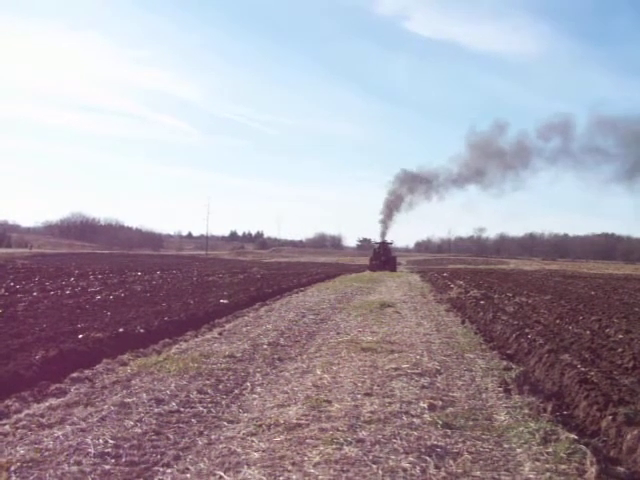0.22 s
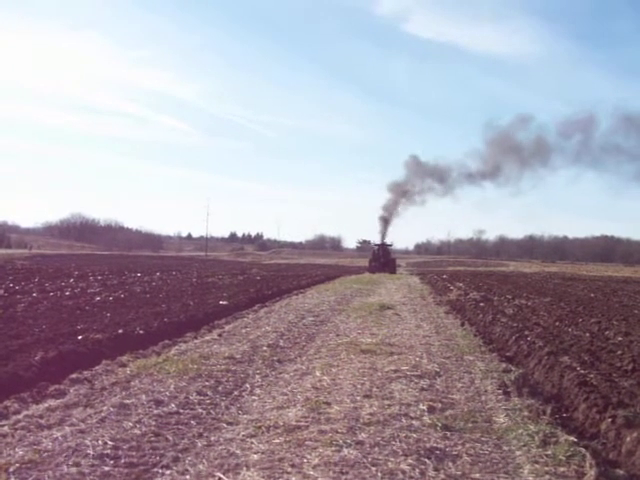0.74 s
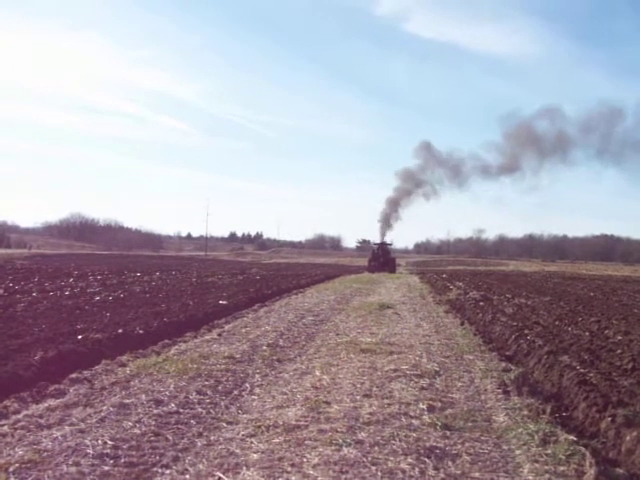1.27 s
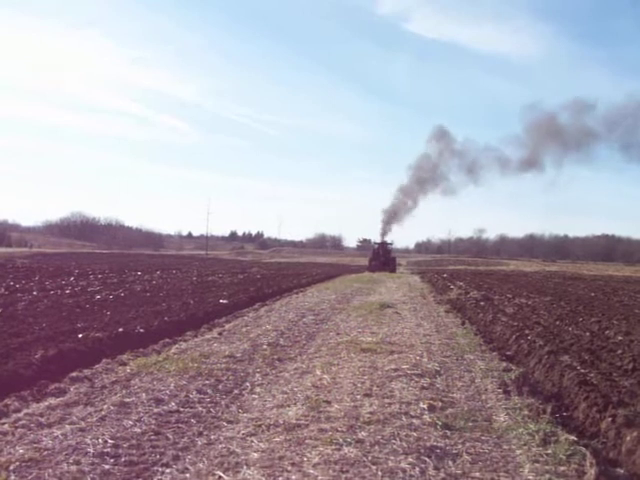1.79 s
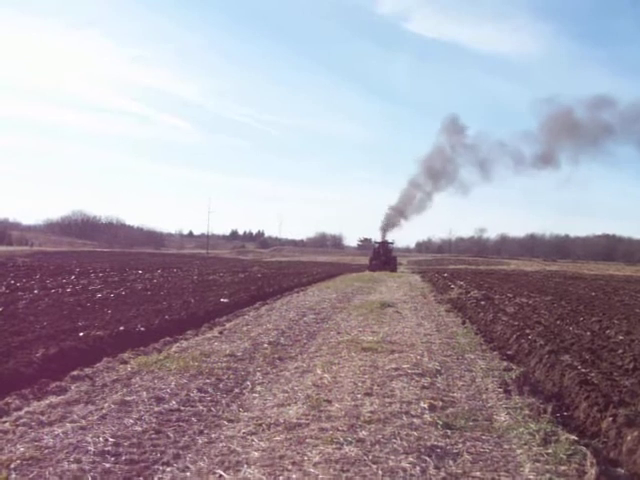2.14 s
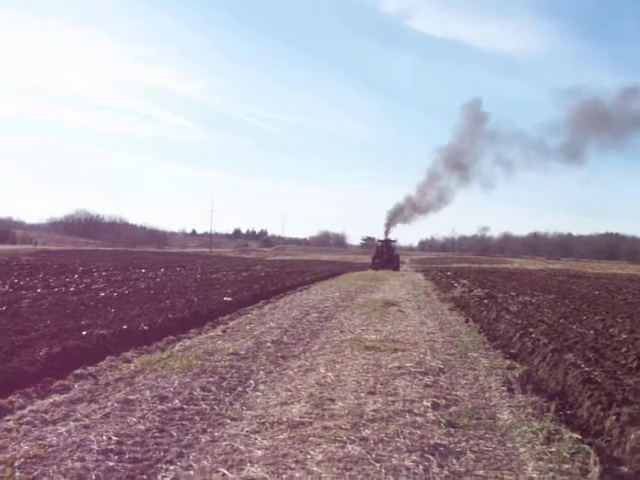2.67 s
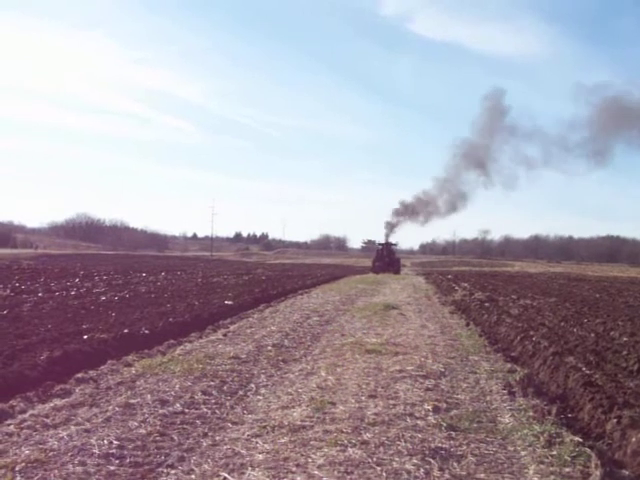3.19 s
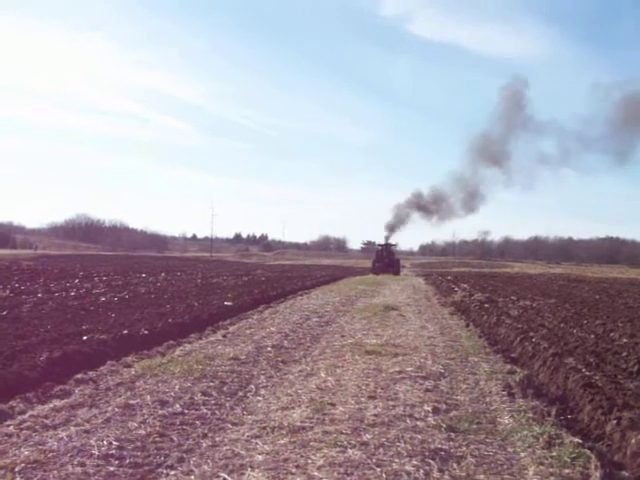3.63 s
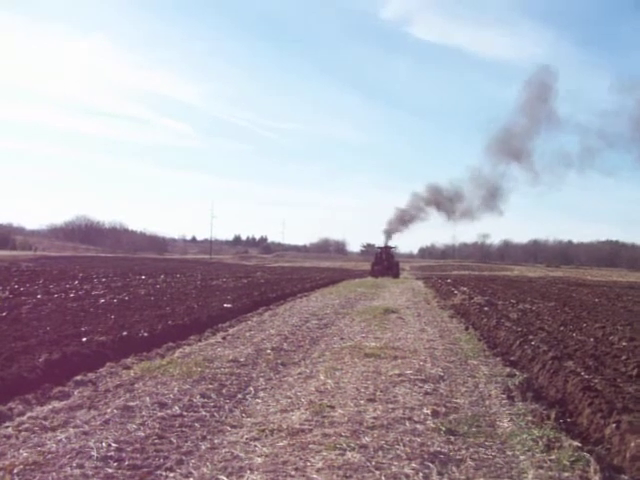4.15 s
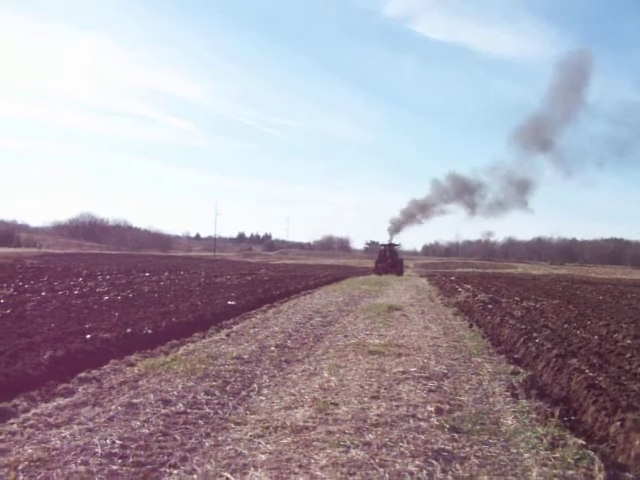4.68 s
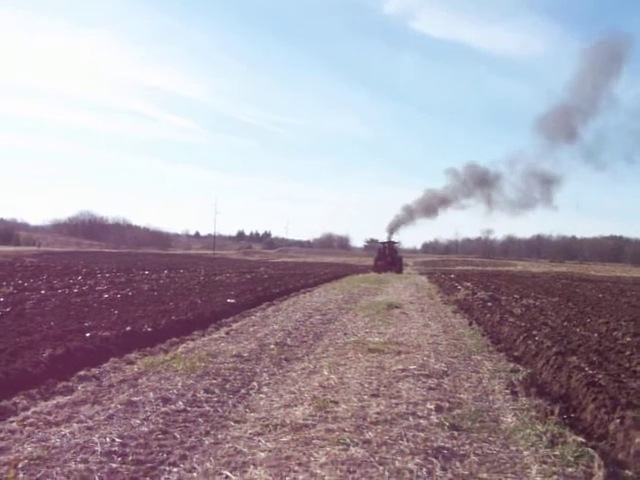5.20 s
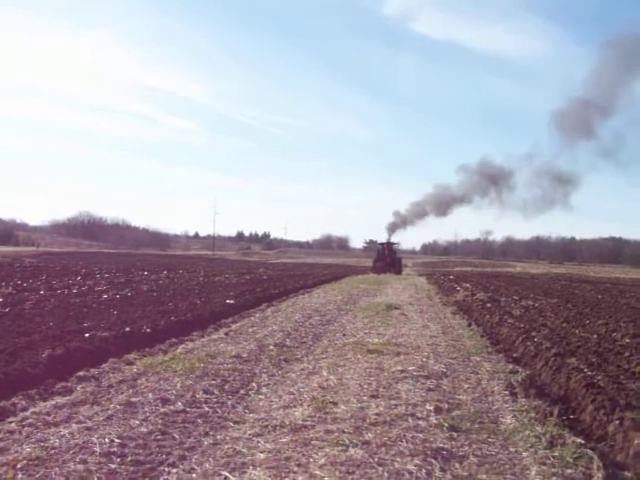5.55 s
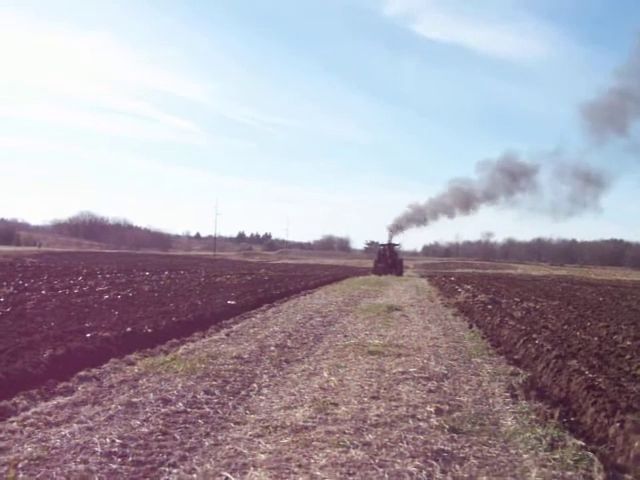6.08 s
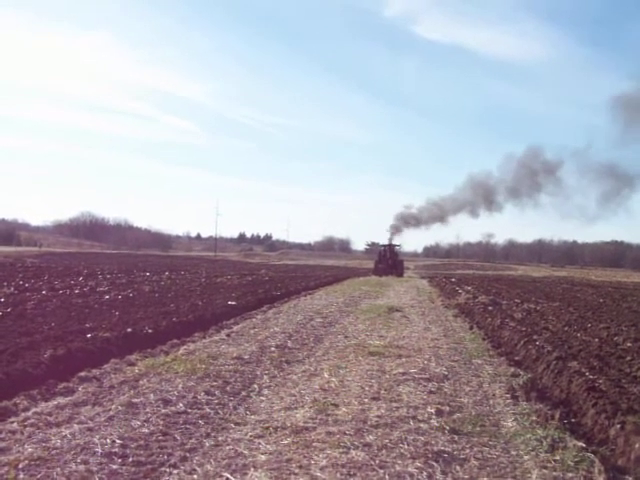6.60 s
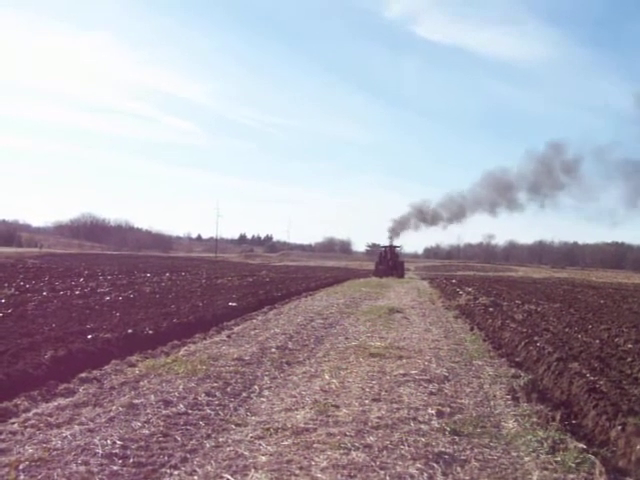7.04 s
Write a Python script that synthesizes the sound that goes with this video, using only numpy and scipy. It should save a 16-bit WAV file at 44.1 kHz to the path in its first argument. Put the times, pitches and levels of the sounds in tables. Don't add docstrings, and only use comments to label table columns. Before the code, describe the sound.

The sound begins with the engine already working: a distant steam traction engine chuffing evenly at just over seven beats a second throughout. Each chuff is a short, raspy burst of steam, mostly midrange and hiss, followed by a thinner after-hiss that cuts off before the next. Strength and brightness vary from beat to beat, with a slightly hollow, drifting colour from the ground reflection. A low rough hum, faint gear tones and a soft field wash continue underneath. Light wind puffs touch the microphone from 0 to 2.5 seconds, with a faint squeak near 1.4. Around 2.6 hard low thumps hit, and fluttering buffets crowd 3.1 to 4.7 seconds, partly covering the engine. From 5 to 6 it is calmer, then gusts return near 6.4 and 6.9. Tiny camera ticks are scattered, several near 2.5 to 3.9. The chuffing continues to the end, around 7.3 seconds, with dull treble.

```python
import sys
import numpy as np
from scipy import signal
from scipy.fft import rfft, irfft, next_fast_len
from scipy.io import wavfile
from scipy.ndimage import uniform_filter1d, map_coordinates

SR = 44100
rng = np.random.default_rng(int(sys.argv[2]) if len(sys.argv) > 2 else 0)


def elevation(decibels):
    levels = np.asarray(decibels, float)
    return 10 ** (levels / 20)


def generate_wav(sig):
    pcm = np.round(np.clip(np.atleast_2d(sig).T, -1, 1) * 32767).astype(np.int16)
    wavfile.write(sys.argv[1], SR, pcm)


N = 322812
T = np.arange(N) / SR

RISE_S, FALL_S = 0.018, 0.016
RAGGED_S, TOP_LATE_S = 0.0028, 0.0023

# start in seconds, blast level in dB, throat band
# against the blast in dB, lower hiss against the blast in dB.
EXHAUST_BEATS = [(-0.032, -23, -16, -23.5), (0.237, -32.5, -1, -3.5), (0.513, -31, -1, -8),
                 (0.784, -34.5, 3, -2), (1.06, -33, 0.5, -0.5), (1.331, -34, 3, -1), (1.604, -31, 0, -6),
                 (1.886, -28, -3, 1), (2.152, -29, 4.5, 1), (2.422, -30.5, 1, 0.5),
                 (2.694, -32.5, 2.5, 2.5), (2.966, -33, -0.5, 0.5), (3.244, -30, -1.5, 2),
                 (3.517, -33.5, 2.5, 0), (3.794, -31, -1.5, -4), (4.076, -37, 5.5, 4),
                 (4.357, -30.5, -1.5, -3), (4.629, -28.5, -4, -1.5), (4.9, -31.5, -2, -2.5),
                 (5.158, -37.5, 4, 1), (5.445, -36.5, 4.5, -1.5), (5.719, -30, 1, -2), (5.99, -30, -3, -1),
                 (6.262, -32.5, 0.5, 3), (6.544, -29, -3, -1), (6.815, -33.5, 1, -3.5),
                 (7.089, -33.5, 4.5, -4.5),
                 (0.105, -29, -3.5, -1.5), (0.381, -30, -0.5, 0.5), (0.651, -31.5, 2.5, -7.5),
                (0.926, -32.5, -2, 1.5), (1.204, -32.5, -1.5, 2.5), (1.475, -30.5, -2, 0),
                (1.75, -27.5, -3, -2), (2.024, -27, -0.5, 0), (2.293, -27, -3.5, -0.5),
                (2.562, -28.5, -0.5, -0.5), (2.833, -30.5, -2, -1.5), (3.108, -30, 0, 0),
                (3.387, -32, -2.5, 4.5), (3.66, -34.5, 5.5, 3.5), (3.943, -34.5, 3.5, 1),
                (4.225, -33, 3, 3.5), (4.495, -30, -0.5, -1.5), (4.77, -27, -4.5, -5.5),
                (5.045, -28.5, -4, -0.5), (5.314, -31, 1.5, -4), (5.588, -32, 1, -1), (5.864, -28.5, -3, 2),
                (6.133, -31, 3, 4), (6.408, -34, 6, 4), (6.687, -33, 4.8, 0), (6.959, -30, 3, -2),
                (7.237, -29.5, 0, -2)]
BEATS = np.array(sorted(EXHAUST_BEATS))


def beat():
    start = BEATS[:, 0] - RISE_S / 2 - RAGGED_S
    k = np.maximum(np.searchsorted(start, T) - 1, 0)
    return k, T - start[k]


def puff(age, hold_s, fall_s):
    rise = np.sin(np.pi / 2 * np.clip(age / RISE_S, 0, 1)) ** 2
    return rise * np.exp(-np.maximum(age - RISE_S - hold_s, 0) / fall_s)


ZONES_HZ = [300, 950, 2100, 3150, 4600, 9500]
# frequency in Hz, density in dB per Hz.
JET_SPECTRUM = [(180, -39), (300, -7), (432, -24), (707, -2.5), (1030, -6), (1410, -4), (1550, -8.5),
                (1950, -8), (2880, -3), (3410, -2), (4210, -5), (4720, -11), (5990, -14.5), (7500, -27.5),
                (8630, -29.5), (11200, -77.5), (19000, -120)]
# time in seconds, clearness in dB.
AIR = [(0, -0.5), (0.3, -3), (0.6, 2), (1.15, -6), (1.55, 0), (1.8, -6.5), (2.15, -1), (2.35, 2),
       (2.6, -4.5), (3.3, -3), (3.6, 5), (4.0, 1.5), (4.75, 1.5), (5.1, -1), (5.85, -2.5), (6.13, 5),
       (6.3, -1.5), (6.8, 1.5)]


def chuffs(k, age):
    s, db, throat, lower = BEATS[k].T
    middle = -7 + 0.51 * throat - 18.5 * (along(ECHO, s)[0] - 0.66)
    top = -9.5 + lower + along(AIR, s)[0]
    hold_s = 0.012 * elevation(0.86 * (-32 - db))
    crackle = walk(260)
    crackle = crackle - uniform_filter1d(crackle, size=900)
    beat_start = np.clip((T - age) * SR, 0, N - 1).astype(int)
    out = 0
    for lo, hi, rel in zip(ZONES_HZ, ZONES_HZ[1:], (throat, middle, lower, 0, top)):
        jet = shaped(lambda hz: colour(JET_SPECTRUM, hz) * zone(hz, lo, hi))
        eddy = walk(110)
        late = RAGGED_S * (1 + np.tanh(eddy[beat_start])) + TOP_LATE_S * (lo / 4600) ** 2
        jet = jet * puff(age - late, hold_s, FALL_S)
        crackle_db = 2.5 * (hi / 4600) ** 0.52 * crackle
        out = out + jet * elevation(db + rel + crackle_db + 1.33 * eddy)
    return out


# frequency in Hz, density in dB per Hz.
HISS_SPECTRUM = [(880, -48), (1500, -13.5), (1720, -7), (2430, -11), (2730, -3.5), (3480, -2.5),
                 (3830, -7.5), (4800, -15.5), (5250, -12), (7290, -45.5), (8630, -27.5), (11200, -75.5),
                 (19000, -120)]
# time in seconds, steam left for the after-blow in dB,
# ring of the loaded gears in dB, high singing of the nozzle in dB.
LOAD = [(0, -37, -40, -0.5), (0.5, -43, -50.5, -7), (0.75, -36.5, -40.5, -3), (1.0, -40.5, -40.5, 0),
        (1.35, -39.5, -40, -4), (1.7, -39.5, -41.5, -4.5), (2.1, -36.5, -37, -6.5),
        (2.65, -36, -40.5, -0.5), (2.98, -37.5, -42.5, 2.5), (3.5, -40.5, -39.5, -8), (3.8, -41, -45, -6),
        (4.15, -40.5, -37.5, -5), (4.75, -41.5, -43.5, 3.5), (5.1, -39, -39, -5), (5.5, -41, -42.5, -2),
        (6.05, -33, -35.5, -5.5), (6.55, -41.5, -44.5, -3.5), (7.2, -39, -38.5, -5)]


def afterblow(k, age):
    sag_db_per_s, shut_s, shut_db = -26.5, 0.1176, -10
    flow = along(LOAD, BEATS[k, 0])[0]
    top = -12.5 + along(AIR, BEATS[k, 0])[0]
    shut = shut_db * np.clip((age - shut_s) / 0.0045, 0, 1)
    db = uniform_filter1d(flow + sag_db_per_s * age + shut, size=800) + 0.43 * walk(200)
    body = shaped(lambda hz: colour(HISS_SPECTRUM, hz) * zone(hz, 1000, 4600))
    body = body * elevation(2.0 + 1.3 * walk(40))
    edge = shaped(lambda hz: colour(HISS_SPECTRUM, hz) * zone(hz, 4600, 8000))
    edge = edge * elevation(1.0 + top + 0.83 * walk(30))
    sing = wavering(3500, 130, 0.03 * walk(12), 0.2) * elevation(-2.5 + 3.0 * walk(25))
    patch = wavering(5600, 340, 0.033 * walk(8.9), 0.1)
    patch = patch * elevation(top + along(LOAD, T)[2] + 4.9 * walk(12))
    return (body + edge + sing + patch) * elevation(db)


# frequency
# in Hz, width in Hz, rms level in dB, swell with each beat in dB.
HUM = [
    (188, 27.7, -38, 4.5),
    (542, 10, -55.5, 7),
    (686.5, 33, -52.5, 8.5),
    (1378, 39, -52, 8),
    (2150, 260, -55, 12.5),
]


def hum(k, age):
    swell = uniform_filter1d(puff(age, 0.02, 0.069), size=600)
    tones = 0
    for hz, width_hz, db, lift in HUM:
        tone = wavering(hz, width_hz, 0.015 * walk(6), 0.43)
        tones = tones + tone * elevation(db + lift * (2 * swell - 1) + 1.1 * walk(4.11))
    gear_ring = wavering(1160, 59, 0.035 * walk(12), 0)
    return tones + gear_ring * elevation(2.5 * walk(20) + along(LOAD, T)[1] - 6.5)


# time in seconds, echo lag in ms.
ECHO = [(0.12, 0.585), (0.95, 0.59), (1.55, 0.655), (2.58, 0.61), (3.41, 0.66), (4.24, 0.75), (5.25, 0.75),
        (6.15, 0.67), (6.6, 0.66), (7.25, 0.665)]


def ground(x):
    lag = (along(ECHO, T)[0] + 0.017 * walk(13)) * SR / 1000
    echo = map_coordinates(x, [np.arange(N) - lag], order=1)
    return level(x + elevation(-8) * echo) * np.std(x)


# start in seconds, length in seconds, pitch in Hz, level in dB.
SQUEAKS = [
    (1.44, 0.033, 7100, -52),
    (2.925, 0.036, 7050, -59),
]


def squeaks():
    out = 0
    for s, length, hz, db in SQUEAKS:
        swell = np.sin(np.pi * np.clip((T - s) / length, 0, 1))
        out = out + elevation(db - 7) * swell * np.sin(2 * np.pi * hz * T)
    return out


# time in seconds, peak level in dB.
TICKS = [(0.0736, -40.5), (1.577, -39), (2.5286, -41.5), (2.712, -37), (3.262, -39), (3.272, -39.5),
         (3.351, -45.5), (3.8713, -36.5), (5.499, -41.5)]


def ticks():
    burst = sum(elevation(db + 1.0) * np.exp(-np.abs(T - s - 0.001) / 0.00072) for s, db in TICKS)
    return burst * shaped(lambda hz: bell(hz, 6000, 4500))


# time in seconds, peak level in dB, pitch in Hz.
SLAPS = [(0.052, -20, 91.5), (1.518, -16.5, 78.1), (2.584, -15, 202), (2.612, -7.5, 183), (2.691, -7, 196),
         (2.702, -7.5, 130), (3.107, -14.5, 184), (3.249, -13.5, 164), (3.613, -9.5, 170),
         (3.668, -10.5, 145), (3.784, -8, 160), (3.856, -10.5, 170), (3.976, -9, 188), (4.074, -10, 119),
         (4.149, -9, 223), (4.21, -6, 160), (4.265, -20.5, 96.9), (4.339, -10, 144), (4.424, -14.5, 97),
         (4.498, -11.5, 132), (4.558, -17, 113), (4.599, -21, 178), (4.7, -14, 146), (6.333, -16, 72.7),
         (6.405, -11, 85)]


def slaps():
    cycles, glide = 1.15, -0.092
    out = np.zeros(N)
    for (s, db, hz), turn in zip(SLAPS, rng.random(len(SLAPS))):
        near = slice(max(int(s * SR) - 2000, 0), int(s * SR) + 4000)
        cycle = (T[near] - s) * hz - cycles / 2
        swing = cycle * (1 + glide * np.tanh(cycle / cycles))
        envelope = np.exp(-(cycle / cycles) ** 2 * 2)
        out[near] += elevation(db - 4.0) * envelope * np.sin(2 * np.pi * (swing + turn))
    return out


# centre in Hz, width in Hz.
WIND_HZ = [
    (48, 41),
    (95, 67),
    (170, 101),
    (285, 242),
]
# time in seconds, level in dB.
BREEZE = [(0, -41), (0.6, -46.5), (1.0, -41.5), (1.9, -39), (2.3, -40), (3.0, -41.5), (3.3, -36.5),
          (4.4, -36), (4.9, -41.5), (5.3, -41.5), (5.8, -37.5), (5.95, -47), (6.1, -40), (6.6, -37.5),
          (6.85, -42), (7.32, -45)]
BREEZE_DB = [1.5, -1.5, -4, -6]
# time in seconds, length in seconds, peak level in dB, pitch in Hz.
GUSTS = [(0.01, .1, -27, 94), (0.102, 0.16, -29.5, 130), (0.445, 0.085, -25.5, 85), (0.976, 0.16, -37, 60),
         (1.211, 0.094, -34, 94), (1.495, 0.11, -31, 85), (1.694, 0.13, -36, 130), (2.038, 0.062, -35, 50),
         (2.11, .1, -32.5, 85), (2.217, 0.075, -28.5, 140), (2.643, .09, -24.5, 165),
         (2.71, .05, -21.5, 260), (2.99, 0.092, -34.5, 195), (3.132, 0.049, -26, 124),
         (3.247, 0.12, -31, 168), (3.453, 0.15, -31, 148), (3.632, .06, -24.5, 180),
         (3.723, .08, -25.5, 85), (3.793, .07, -24.5, 176), (3.92, .2, -27, 150), (4.253, 0.11, -27.5, 100),
         (4.18, 0.21, -23, 153), (4.315, 0.1, -25.5, 178), (4.428, 0.033, -21.5, 85),
         (4.55, .3, -24.5, 148), (5.44, .2, -34, 85), (6.03, 0.064, -32.5, 168), (6.377, 0.21, -26, 105),
         (6.54, 0.12, -33, 158), (6.944, .11, -25.5, 85)]


def wind():
    s, length, peak, pitch_hz = np.transpose(GUSTS)[:, :, None]
    step = T[::64]
    lump = np.exp(-(2.45 * (step - s) / length) ** 2)
    eddy, gust = walk(32), 0
    for (hz, width_hz), share in zip(WIND_HZ, BREEZE_DB):
        breeze_power = elevation(along(BREEZE, step)[0] + share) ** 2
        gust_db = peak - 10 * np.log2(hz / pitch_hz) ** 2
        power = breeze_power + (lump * elevation(gust_db) ** 2).sum(axis=0)
        band = wavering(hz, width_hz, 0.12 * walk(25), 0.71, order=3)
        band = band * np.interp(T, step, np.sqrt(power))
        gust = gust + band * elevation(-1.25 + 1.75 * eddy + 0.97 * walk(24))
    return 0.26 * np.tanh(gust / 0.27)


# frequency in Hz, density in dB per Hz.
FIELD_SPECTRUM = [(120, -49), (200, -6), (433, -27), (694, -7.5), (982, -12), (1150, -12.5), (1570, -13.5),
                  (2300, -18), (3520, -11.5), (4820, -24.5), (6010, -29), (7490, -36.5), (8630, -44.5),
                  (11200, -83), (19000, -120)]


def field():
    return shaped(lambda hz: colour(FIELD_SPECTRUM, hz)) * elevation(-40 + 1.1 * walk(3.18) + 1.5 * walk(25))


def wavering(centre_hz, width_hz, drift, even, order=1):
    size = next_fast_len(N)
    gain = (1 + (2 * np.fft.fftfreq(size, 1 / SR) / width_hz) ** 2) ** (-order / 2)
    real, imag = rng.standard_normal((2, size))
    slow = np.fft.ifft(gain * (real + 1j * imag))[:N]
    slow = slow / np.std(slow)
    slow = slow / (np.abs(slow) + 0.031) ** np.clip(even, 0, 1)
    carrier = np.exp(2j * np.pi * np.cumsum(centre_hz * (1 + drift)) / SR)
    return level((slow * carrier).real)


def shaped(gain):
    size = next_fast_len(N)
    hz = np.maximum(np.fft.rfftfreq(size, 1 / SR), 1)
    return level(irfft(rfft(rng.standard_normal(size)) * gain(hz), size)[:N])


def colour(table, hz):
    f, db = np.transpose(table)
    return elevation(np.interp(np.log(hz), np.log(f), db, left=-90, right=-90))


def bell(hz, centre_hz, width_hz, order=1):
    return (1 + ((hz - centre_hz ** 2 / hz) / width_hz) ** 2) ** (-order / 2)


def zone(hz, lo_hz, hi_hz):
    return np.sqrt(1 / (1 + (hz / hi_hz) ** 16) - 1 / (1 + (hz / lo_hz) ** 16))


def walk(rate):
    k = int(SR / rate)
    held = np.repeat(rng.standard_normal(N // k + 1), k)
    return 1.3 * uniform_filter1d(uniform_filter1d(held, k), k)[:N]


def along(table, s):
    at, *columns = np.transpose(table)
    return [np.interp(s, at, column) for column in columns]


def level(x, db=0):
    return x * elevation(db) / np.sqrt(np.mean(x ** 2))


def scene():
    k, age = beat()
    engine = ground(chuffs(k, age)) + afterblow(k, age) + hum(k, age)
    return (engine + field() + wind() + slaps() + ticks() + squeaks())[None]


# frequency in Hz, gain in dB.
MIC = [(10, 1.5), (7600, -2), (8000, -7.5), (8500, -14), (8800, -21), (9000, -27.5), (9300, -36)]


def low_pass(x):
    return signal.sosfilt(signal.butter(12, 9050, fs=SR, output="sos"), x)


def record(dry):
    size = next_fast_len(N)
    hz = np.fft.rfftfreq(size, 1 / SR) + 10
    heard = irfft(rfft(dry, size) * colour(MIC, hz), size)[:, :N]
    return low_pass(heard)


dry = scene()
out = record(dry)
generate_wav(out)
```